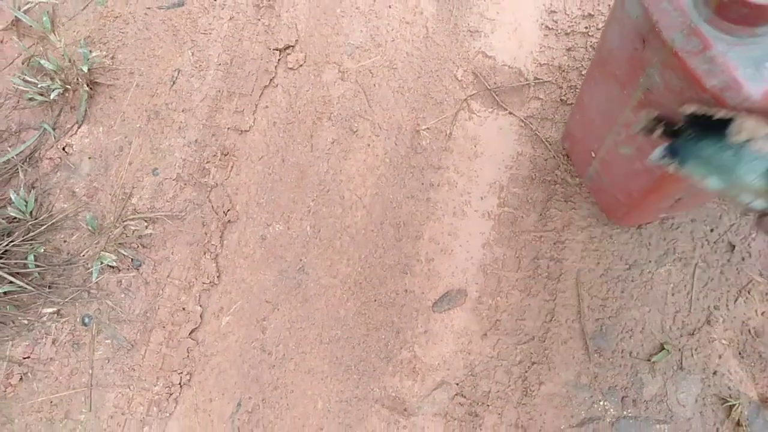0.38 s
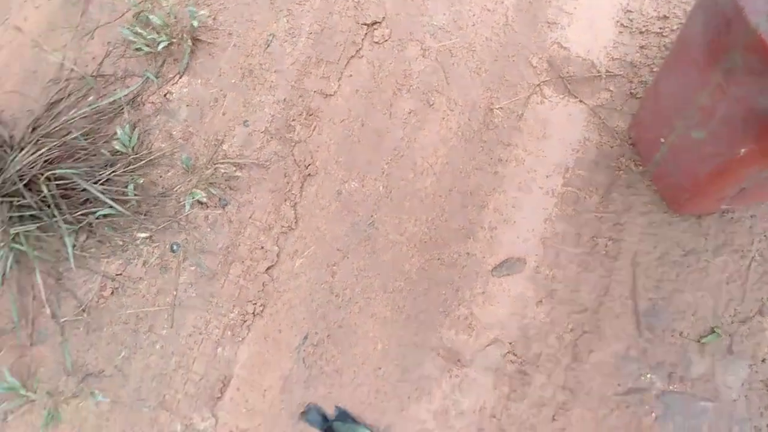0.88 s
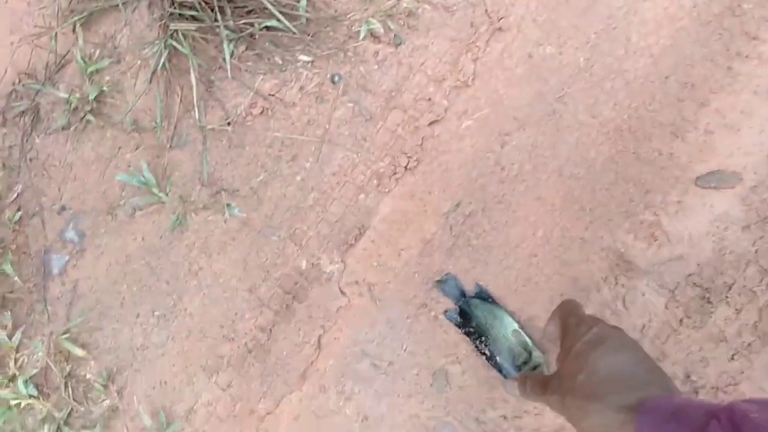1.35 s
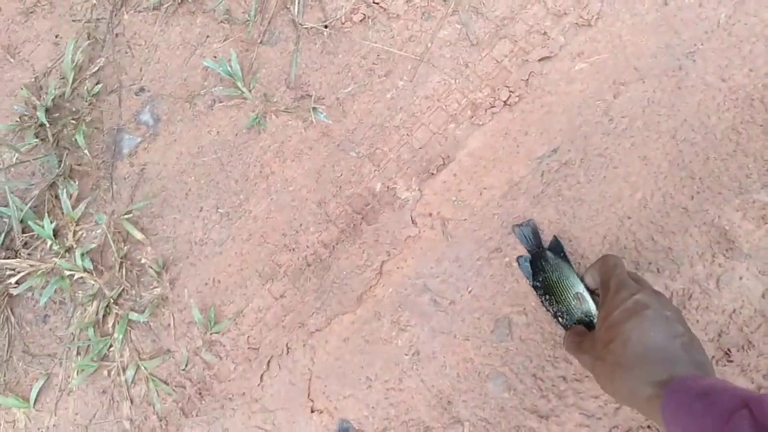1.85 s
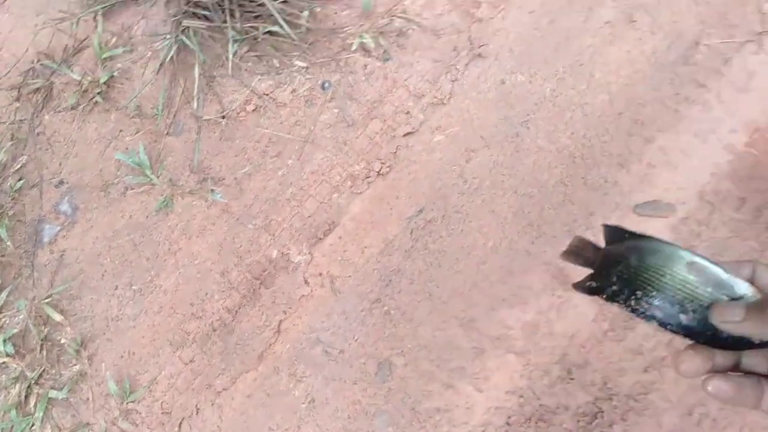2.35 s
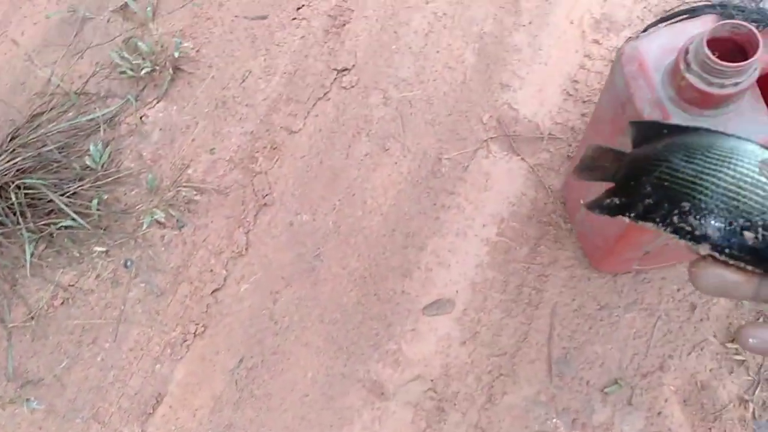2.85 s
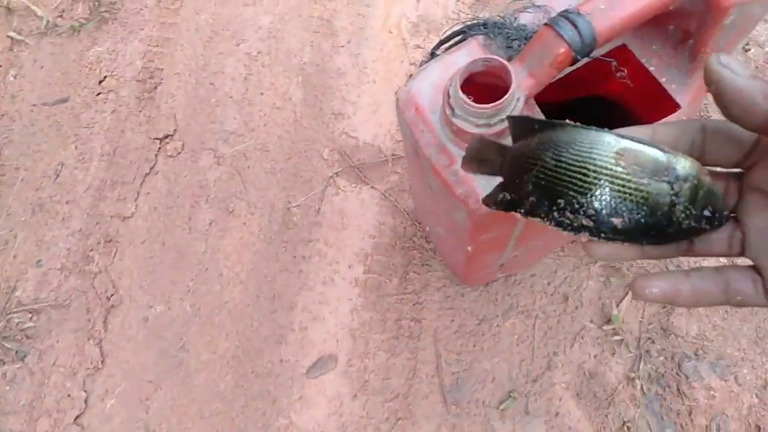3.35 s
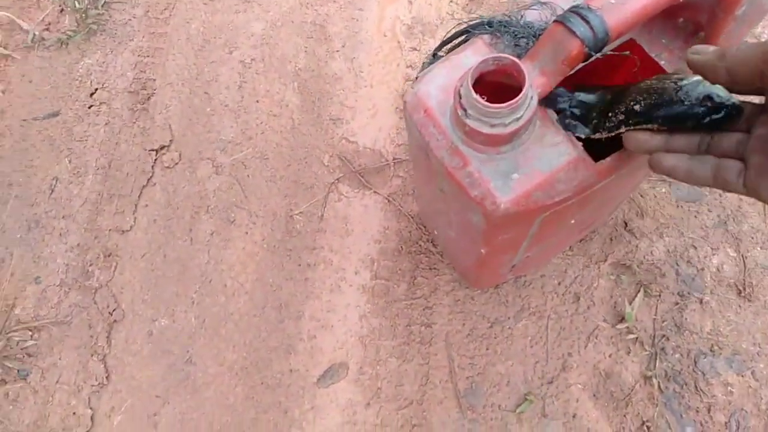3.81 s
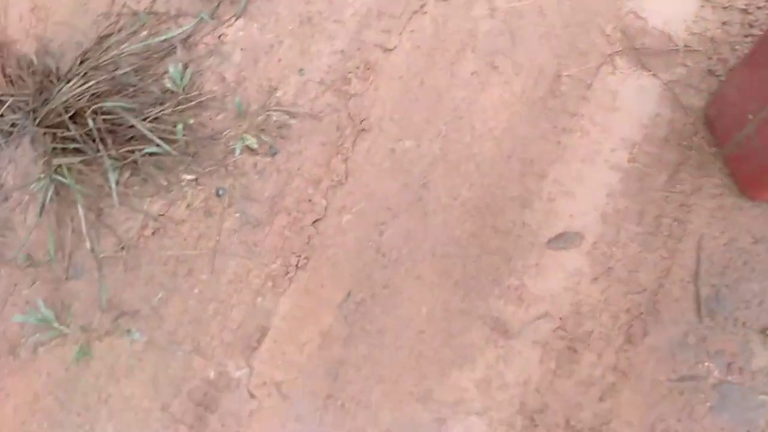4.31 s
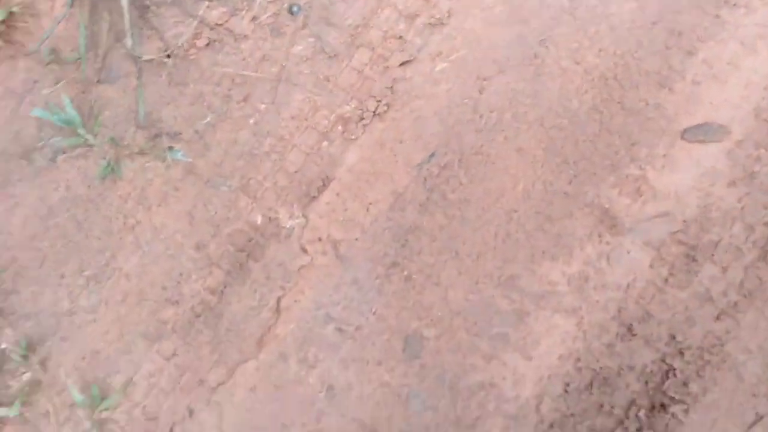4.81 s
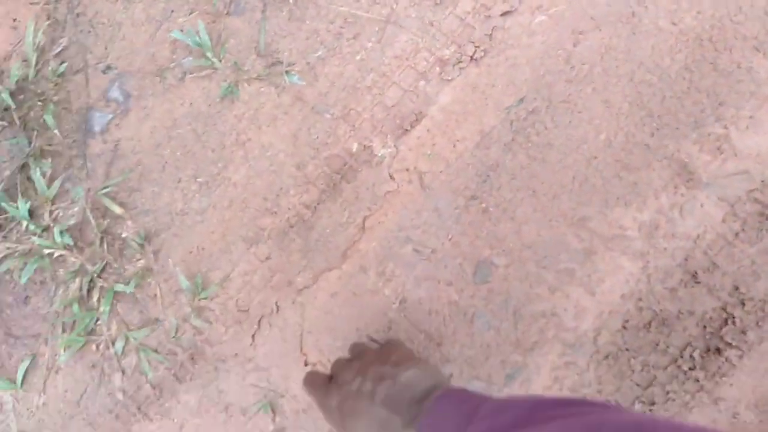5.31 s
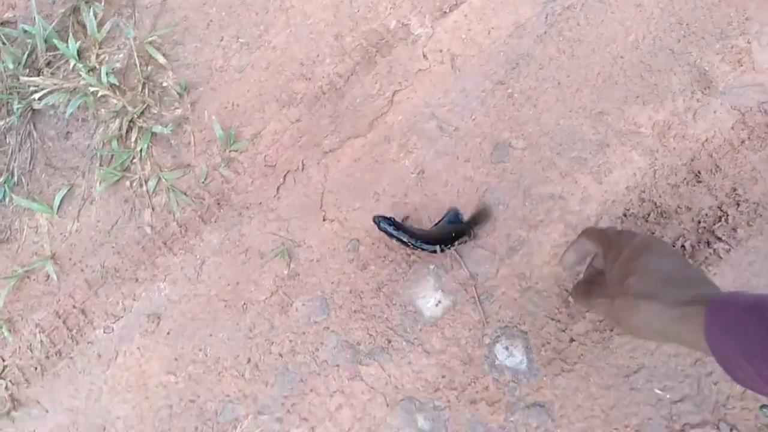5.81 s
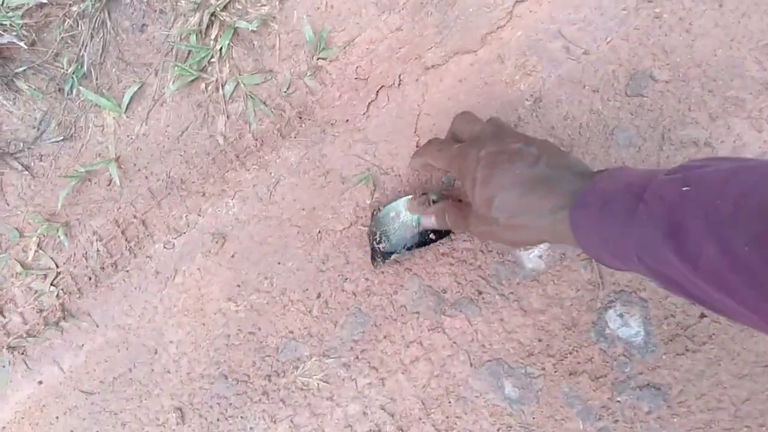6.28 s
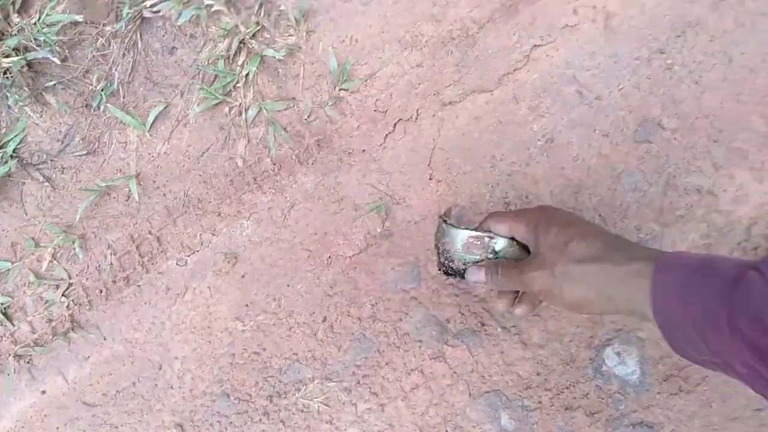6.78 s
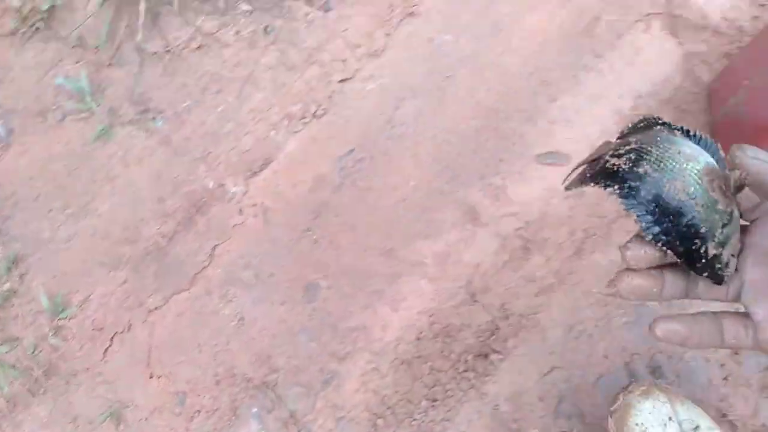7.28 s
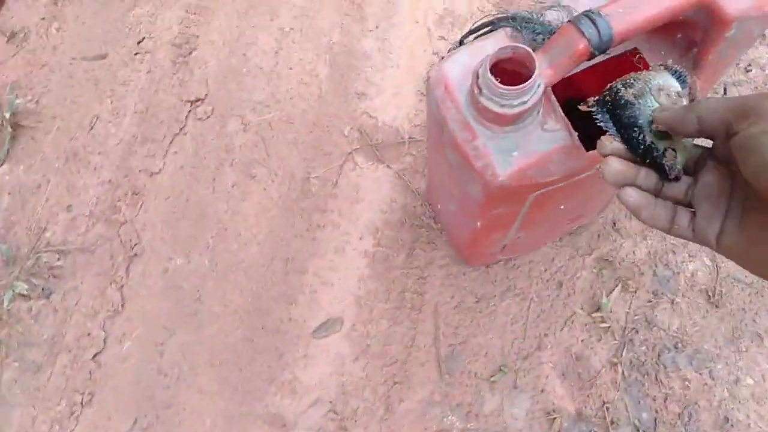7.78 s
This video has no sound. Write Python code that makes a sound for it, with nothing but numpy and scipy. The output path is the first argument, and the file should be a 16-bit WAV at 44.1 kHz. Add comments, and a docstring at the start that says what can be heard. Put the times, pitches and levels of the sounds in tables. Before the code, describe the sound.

A dense, high insect chorus runs throughout on an open dirt track with light wind and soft rustling. Close to the microphone, a hand handles small fish: light taps first, then thick wet slaps, grit spray and plops against a thin plastic can. After about five seconds mostly dry taps on dirt remain, before a last burst of slaps and scuffs and a small wind puff.

```python
"""Insects sing steadily over a dirt track, as noisy pulses ringing in wings; light wind, rustle and hiss are shaped noise.
Soon a hand starts on small fish and a plastic can: clicks make taps, noise bursts make slaps, low tones make thuds.
Grit sprays, a few high chirps sound, sleeve and sandals scuff (dragged clicks), and rising tones plop in the can.
From 2 to 5 s fish flap thickly, the can wall rings, and a faint run of ticks passes near 3.3 s.
Then come mostly taps on dirt, a last flurry of slaps and scuffs after 7 s, and a puff of wind at 8 s."""
import sys
import numpy as np
from scipy import signal
from scipy.io import wavfile

SR = 44100
rng = np.random.default_rng(int(sys.argv[2]) if len(sys.argv) > 2 else 0)


def invert_db(level):
    """Linear amplitude ratio for a level in decibels (20 dB per decade), elementwise."""
    return 10 ** (np.asarray(level, dtype=float) / 20)


def store_wav(level_fs):
    """Save 16-bit WAV to argv[1]."""
    pcm = np.round(np.clip(np.atleast_2d(level_fs), -1, 1) * 32767)
    wavfile.write(sys.argv[1], SR, pcm.T.astype(np.int16))


N = 358974  # length in samples

# insect kinds: wing_hz, pitch_spread_hz, ring_t60_s (time to fall 60 dB), pulses_per_s, chirps_per_s, #
# throb_db, level_db, near_db (near singer against each of the others); # the last row is the high overtone of
# the 6.7 kHz singers, made the same way as a kind
INSECT_KINDS = [(4667, 123, 0.032, 125, 12.2, 0.5, -51.5, -1), (5415, 410, 0.0053, 58, 7.9, 4, -50, -5),
                (6690, 280, 0.015, 83.2, 15, 2, -48.5, 5), (7520, 25, 0.066, 200, 7.7, 6, -65, 20),
                (9450, 70, 0.015, 60, 14, 4, -70, 21), (13650, 220, 0.008, 100, 20, 1, -54, 16)]
# the whole choir swells as one: time_s, change_db
CHOIR_SWELL = [(0.0, .5), (0.36, -0.5), (4.22, 1.5), (5.0, -.5), (5.24, 0), (6.82, 0.9), (8.14, 0.)]
# the faint fifth kind sings up for a while
BOUT_S, BOUT_HALF_S, BOUT_DB = 4.3, 0.7, 7

# tone colour of the wind: pitch_hz, density_db (per Hz)
WIND_COLOUR = [(14, 14), (24, 5), (40, -9.5), (70, 1), (120, -8), (260, -28)]
# puffs of wind on the microphone port: peak_s, peak_db, half_length_s
WIND_PUFFS = [(0.97, -41, 0.055), (2.175, -48, 0.046), (2.76, -54, 0.076), (3.107, -59, .08),
              (3.3, -53, .09), (4.62, -50, 0.55), (5.192, -55, 0.064), (7.196, -53, 0.14),
              (7.9, -48.5, 0.11), (8.03, -36, 0.043)]
BREEZE_DB = -53  # steady wind under the puffs

# how busy hand and body are, as rustle level: time_s, level_db
STIRRING = [(0.0, -51), (0.91, -53.5), (0.97, -49.5), (1.75, -53), (2.18, -46), (2.51, -50), (2.73, -45.5),
            (2.9, -49.5), (3.29, -50), (3.42, -53), (4.06, -48), (4.62, -50), (5.42, -53), (6.35, -51),
            (7.2, -52.5), (7.33, -43.5), (7.78, -51), (8.14, -53.5)]
# tone colour of the rustle: pitch_hz, density_db (per Hz)
RUSTLE_COLOUR = [(71, -18), (120, -1.5), (159, -0.5), (280, -9), (818, -9), (921, -10.5), (2940, -13.5),
                 (3780, -17), (4200, -3), (5460, -35.5), (9240, -120)]
# tone colour of the far hiss: pitch_hz, density_db (per Hz)
HISS_COLOUR = [(3600, -52), (6000, 14), (7400, -0.5), (8200, -5.5), (10000, 0), (12200, -4), (13200, 2),
               (15900, 2.5)]
HISS_DB, HISS_FOLLOWS = -48, 0.52  # level at mean stirring; share of its swing in dB
SQUELCH_FROM_DB, SQUELCH_PER_S_DB = -52, 41  # crackles start above this stirring; more per second for each dB

# dry taps and snaps of finger, fin and grit on dirt: start_s, peak_db, centre_hz
DRY_TAPS = [(0.239, -37, 694), (0.301, -23, 2980), (0.692, -28.5, 3000), (1.107, -31.5, 1710),
            (1.309, -28, 2600), (1.81, -29, 3000), (2.651, -19, 1870), (3.274, -37, 2140),
            (3.76, -33, 2100), (4.5042, -35, 4430), (4.361, -29, 1730), (4.606, -39, 2500),
            (4.679, -28, 7000), (4.746, -20, 1490), (4.979, -39, 840), (5.056, -33, 6520),
            (5.18, -33, 3400), (5.247, -17.5, 1180), (5.287, -40, 1030), (5.49, -27, 3000),
            (5.767, -27.5, 556), (5.7723, -24, 9000), (5.82, -36, 738), (5.95, -24, 2710),
            (5.978, -25.5, 540), (6.002, -25.5, 1730), (6.123, -31.5, 960), (6.194, -16.5, 1790),
            (6.1926, -22, 9100), (6.234, -22.5, 2320), (6.353, -35, 3000), (6.446, -35, 999),
            (6.517, -29, 2670), (6.957, -29, 3190), (7.042, -33, 6330), (7.063, -26, 3700),
            (7.152, -27, 493), (7.17, -31, 800), (7.178, -28, 784), (7.211, -22, 520), (7.264, -38, 2420),
            (7.3616, -19, 5920), (7.424, -25, 5760), (7.513, -23, 1470), (7.897, -26, 1450)]
# wet slaps of fish on hand and can: start_s, level_db, centre_hz, t60_s
WET_SLAPS = [(0.299, -31, 975, 0.076), (0.689, -39, 900, 0.068), (0.93, -36, 1780, 0.069),
             (1.005, -40, 1630, 0.055), (1.254, -44, 503, 0.057), (1.974, -33.5, 1890, 0.16),
             (2.146, -27.5, 950, 0.13), (2.212, -32.5, 1410, 0.051), (2.307, -24.5, 1030, 0.037),
             (2.39, -41.5, 503, 0.043), (2.576, -40, 3860, 0.12), (2.651, -19, 1620, 0.07),
             (2.716, -48, 511, 0.06), (2.842, -31.5, 3160, 0.05), (2.945, -33, 1260, 0.1),
             (2.976, -26, 2140, 0.044), (3.125, -27, 1420, 0.064), (3.298, -25.5, 2770, 0.046),
             (3.413, -33.5, 2500, 0.012), (3.457, -41.5, 2140, 0.16), (3.759, -35.5, 2110, 0.047),
             (3.776, -29, 1210, 0.061), (3.895, -42.5, 681, 0.095), (3.933, -35.5, 990, 0.22),
             (3.98, -30.5, 910, 0.045), (4.024, -35, 910, 0.14), (4.045, -21.5, 899, 0.056),
             (4.166, -38, 2490, 0.055), (4.239, -38.5, 810, 0.1), (4.29, -42.5, 2550, 0.072),
             (4.359, -36.5, 1670, 0.031), (4.505, -29, 3800, 0.021), (4.744, -33, 730, 0.04),
             (7.061, -44, 450, 0.041), (7.178, -40, 3290, 0.034), (7.209, -22.5, 440, 0.041),
             (7.421, -27, 2700, 0.077), (7.439, -27, 1480, 0.074)]
# ringing modes of the thin can wall: pitch_hz, level_db, t60_s
CAN_MODES = [(510, -2, 0.028), (837.5, -9.5, 0.12), (910, -7, 0.022), (1284, -11, 0.11), (1630, -7.5, 0.05),
             (1810, -14, 0.11), (2140, -8, 0.048), (2583, -6, 0.035), (3300, -11, 0.046)]
WALL_OVER_SLAP_DB = -0.5
# dull thuds of handling: start_s, level_db, pitch_hz
HANDLING_THUDS = [(0.319, -34.5, 215), (0.732, -42.5, 221), (0.925, -40, 254), (1.25, -33.5, 205),
                  (1.739, -40.5, 120), (1.971, -31.5, 210), (2.141, -37.5, 224), (2.209, -36.5, 234),
                  (3.072, -39.5, 144), (3.276, -36.5, 127), (3.483, -39.5, 244), (3.899, -34.5, 198),
                  (3.982, -30, 213), (4.047, -25, 216), (4.181, -36.5, 116), (4.483, -37, 119),
                  (4.741, -46, 169), (5.203, -45.5, 112), (7.204, -41, 174)]

# wet ticks and spray: start_s, droplets_db, duller_grit_db
WET_SPRAY = [(0.519, -39, -56), (0.937, -29.5, -61), (0.968, -26, -33), (1.01, -26, -43), (1.109, -39, -44),
             (1.975, -29, -48), (2.0472, -40, -53), (2.2115, -23.5, -28), (2.3063, -28, -25),
             (2.388, -34, -56), (2.44, -45, -31), (2.5, -36, -34), (2.572, -32, -36), (2.6424, -29, -31),
             (2.7208, -29.5, -46), (2.973, -25, -35), (3.2181, -33.5, -41), (3.775, -39, -26),
             (4.1704, -42, -34), (4.1874, -35, -33.5), (4.505, -32, -24.5), (4.744, -36, -38),
             (5.053, -41, -37), (5.7692, -30.5, -32), (6.191, -34, -30), (6.955, -39.5, -36),
             (7.3083, -41, -44), (7.359, -34, -18), (7.416, -40, -24.5)]
SPRAY_T60_S = 0.085  # the duller grit falls twice as fast
# tone colour of fine grit: pitch_hz, density_db (per Hz)
GRIT_COLOUR = [(6500, -2), (9000, -10), (12300, -7.5), (13300, -1), (14500, 1), (15900, -5)]

# lone high chirps: start_s, level_db, pitch_hz
HIGH_CHIRPS = [(0.5891, -42, 10300), (0.8036, -33.5, 9140), (1.1573, -42.5, 9600), (1.2491, -41, 8460),
               (1.5594, -44, 9500)]
# bubbles and drips in the can: start_s, level_db, pitch_hz
CAN_PLOPS = [(0.93, -37, 1874), (0.983, -27, 3130), (1.008, -28, 1985), (1.019, -28, 3440),
             (1.809, -28.5, 2610), (2.004, -22.5, 1386), (2.086, -26.5, 1350), (2.128, -33, 1630),
             (2.339, -41.5, 2110), (2.444, -41.5, 2300), (2.49, -36, 850), (2.555, -38, 996),
             (2.594, -39, 2110), (2.669, -40, 850), (2.749, -34.5, 493), (2.95, -32, 1284),
             (3.009, -36, 873), (3.062, -45, 3000), (3.088, -43.5, 1430), (3.272, -26, 2140),
             (3.296, -30.5, 2990), (3.412, -28, 2610), (3.459, -25.5, 2050), (3.469, -39, 3000),
             (3.567, -37.5, 1620), (3.601, -43, 3220), (3.642, -33, 2080), (3.692, -41.5, 1780),
             (3.772, -28.5, 1230), (3.856, -43.5, 1680), (4.029, -21, 899), (4.046, -23.5, 899),
             (4.184, -43, 1930), (4.214, -36.5, 853), (4.294, -42, 2500), (4.45, -38.5, 3030),
             (4.474, -37, 3670), (4.869, -45.5, 740), (4.998, -37.5, 812), (7.179, -27, 3300)]
CHIRP_T60_S, PLOP_T60_S = 0.047, 0.076

# drawn-out scuffs of hand, cloth and sole: peak_s, rise_s, fall_s, body_db, grit_db
SCUFF_STROKES = [(1.012, 0.088, 0.048, -32, -36.5), (2.92, 0.86, 0.51, -47.5, -48),
                 (4.055, 0.14, 0.031, -31, -40), (4.184, .034, 0.28, -44.5, -38),
                 (7.19, 0.21, 0.34, -41.5, -50), (7.43, 0.28, 0.043, -31.5, -32),
                 (7.5, 0.23, 0.35, -43, -52), (4.72, 0.12, 0.22, -47.5, -45)]
# what each scuff rings in, one list a scuff: pitch_hz, width_hz, density_db (per Hz)
SCUFF_RESONANCES = [
    [(1620, 180, 1), (3300, 1100, -6.5)],
    [(520, 59, 10), (740, 270, 5), (2630, 110, -6)],
    [(899, 470, -20.5), (1804, 44, -11)],
    [(840, 34, 2), (1930, 150, 1), (2550, 700, 9)],
    [(493, 150, -2), (2410, 87, -4), (3400, 250, 1)],
    [(713, 270, 0), (2560, 280, -4), (5590, 450, 3.5)],
    [(700, 620, 7), (2450, 200, 0)],
    [(1180, 1500, 5), (2500, 710, -3)],
]
# tone colour of the broad part of a scuff: pitch_hz, density_db (per Hz)
SCUFF_COLOUR = [(200, -13), (700, -5), (2000, 0), (4000, -1.5), (7000, -2.5)]
SCUFF_SWELL_DB, GRIT_SWELL_DB = 24.5, 31.5  # how far body and grit sink at either end of a stroke

# a faint run of small ticks
RATTLE_S, RATTLE_HALF_S, RATTLE_PER_S, RATTLE_HZ, RATTLE_DB = 3.33, 0.22, 44, 3950, -31
RATTLE_TICKS = 24

CUTOFF_HZ = 15520  # top of the finished sound


def rms_one(x):
    """Scales a sound to an average strength (rms) of 1."""
    return x / np.sqrt(np.mean(x ** 2) + 1e-20)


def in_time(rows):
    """Draws straight lines between (time, value) rows, one value a sample."""
    return np.interp(np.arange(N) / SR, *np.transpose(rows))


def hump(s, half_s):
    """A smooth swell of height 1 around a moment."""
    return np.exp(-((np.arange(N) / SR - s) / half_s) ** 2)


def drift(rate_hz):
    """Slow random wandering with spread 1, made at every 40th sample and joined up."""
    r = np.exp(-80 * np.pi * rate_hz / SR)
    noise = rng.standard_normal(N // 40 + 2002)
    slow = signal.lfilter([1], [1, -2 * r, r * r], noise)[2000:]  # skip the filter's start
    return np.interp(np.arange(N) / 40, np.arange(len(slow)), rms_one(slow))


def ring(clicks, hz, t60):
    """A resonance: each unit click sets off a fading sine of starting height 1."""
    r = invert_db(-60 / (t60 * SR))
    w = 2 * np.pi * hz / SR
    return signal.lfilter([0, np.sin(w)], [1, -2 * r * np.cos(w), r * r], clicks + 1e-18)


def band(x, low_hz, high_hz):
    """Keeps the sound between two pitches."""
    return signal.sosfilt(signal.butter(2, [low_hz, high_hz], "band", fs=SR, output="sos"), x)


def coloured(source, spectrum, patchy_db):
    """Filters two noises by turns in about third-octave bands, each with its level and flicker; rms 1."""
    hz, db = np.transpose(spectrum)
    edges = np.geomspace(hz[0], hz[-1], int(3 * np.log2(hz[-1] / hz[0])) + 3)
    out = 0
    for k, (low, high) in enumerate(zip(edges, edges[1:])):
        level_db = np.interp(np.log(low * high) / 2, np.log(hz), db)
        flicker_db = patchy_db * drift(11.2)
        out = out + invert_db(level_db + flicker_db) * band(source[k % 2], low, high)
    return rms_one(out)


def grains(per_s, size_db):
    """Two rows of random clicks, up or down, most small and a few much larger."""
    sizes = invert_db(size_db * np.minimum(rng.exponential(1, (2, N)), 5))
    signs = rng.choice([-1, 1], (2, N))
    present = rng.random((2, N)) < per_s / SR
    return sizes * signs * present


def burst(t60, rise_s):
    """Loudness shape of one blow: a quick rise, then an exponential fall."""
    t = np.arange(int(SR * min(t60, 0.25)) + 64) / SR
    return np.minimum(t / rise_s, 1) * invert_db(-60 * t / t60)


def add(out, s, piece):
    """Mixes a short piece in at a given second."""
    at = round(s * SR)
    out[at:at + len(piece)] += piece[:N - at]


def insects():
    """Each kind is four singers whose noisy wing strokes ring at wing pitch; the near one keeps the set pace."""
    t, out = np.arange(N) / SR, np.zeros(N)
    for kind, row in enumerate(INSECT_KINDS):
        hz, spread, t60, pulses, chirps, throb_db, level_db, near_db = row
        swell_db = in_time(CHOIR_SWELL)
        if kind == 4:
            swell_db = swell_db + BOUT_DB * hump(BOUT_S, BOUT_HALF_S)
        crowd = 0
        for k, (pace, start) in enumerate(rng.normal(0, 1, (4, 2))):
            near = k == 0
            phase = pulses * (1 + 0.05 * pace * (not near)) * t + start
            strokes = 1.7 + np.cos(2 * np.pi * phase)
            throb = invert_db(throb_db * np.cos(2 * np.pi * phase * chirps / pulses) + 2.3 * drift(0.5))
            scraping = strokes * throb * rng.standard_normal(N) * invert_db(near_db * near)
            # the others sit below and above the near singer's pitch
            pitch_hz = hz + spread * (k - 1.43 * (k > 1)) * (-1) ** k
            crowd = crowd + ring(scraping, pitch_hz, t60)
        out += invert_db(level_db + swell_db) * rms_one(band(crowd, hz * 0.947, hz * 1.045))
    return out


def wind():
    """Low, lumpy noise: a steady breeze on the microphone port with short puffs."""
    gusts = invert_db(BREEZE_DB) + sum(invert_db(db) * hump(s, half_s) for s, db, half_s in WIND_PUFFS)
    rumble = coloured(rng.standard_normal((2, N)), WIND_COLOUR, patchy_db=5.5)
    return gusts * band(rumble, 8.2, 270)


def rustle(rustle_db):
    """Soft noise with stray ticks, as loud as the stirring."""
    source = rng.standard_normal((2, N)) + 1.2 * grains(150, 3.5)
    return invert_db(rustle_db) * coloured(source, RUSTLE_COLOUR, patchy_db=1.0)


def hiss(rustle_db):
    """Far bright noise that partly follows the stirring."""
    hiss_db = HISS_DB + HISS_FOLLOWS * (rustle_db - rustle_db.mean())
    return invert_db(hiss_db) * coloured(rng.standard_normal((2, N)), HISS_COLOUR, patchy_db=0.4)


def squelches(rustle_db):
    """Small wet crackles, only while things stir, each ringing some cycles at one of twelve pitches."""
    per_s = SQUELCH_PER_S_DB * np.clip(rustle_db - SQUELCH_FROM_DB, 0, 8)
    born = rng.random(N) < per_s / SR
    sizes = born * invert_db(5.9 * np.minimum(rng.exponential(1, N), 3))
    dealt = rng.integers(0, 12, N)  # which pitch each crackle gets
    out = np.zeros(N)
    for k, hz in enumerate(np.geomspace(900, 5500, 12)):
        out += ring(sizes * (dealt == k), hz, 44.0 / hz)
    return invert_db(-54) * out


def taps():
    """One hard contact, a click in a wide band that rings a cycle or two, in quickly fading noise."""
    out = np.zeros(N)
    for s, db, hz in DRY_TAPS:
        contact = 0.13 * rng.standard_normal(1200) * invert_db(-2500 * np.arange(1200) / SR)
        contact[[20, 24]] += 1, -0.3  # the hit and its rebound
        click = band(contact, max(hz * 0.32, 200), min(hz * 2.2, 16000))
        add(out, s, invert_db(db) * click / np.abs(click).max())
    return out


def slaps():
    """A wet blow: a crack, then a short gritty burst of noise around its centre pitch."""
    out = np.zeros(N)
    for s, db, hz, t60 in WET_SLAPS:
        shape = burst(np.clip(t60, 0.01, 0.2), 0.0012)
        noise = rng.standard_normal(len(shape))
        gritty = noise * np.abs(noise) ** 0.78  # makes the peaks stand out
        gritty[10] += 6.0  # first contact
        edges = max(hz * 0.43, 250), min(hz * 2.13, 6000)
        add(out, s, invert_db(db) * shape * rms_one(band(band(gritty, *edges), *edges)))
    return out


def can_wall():
    """Each slap also shakes the thin can wall, which rings in its own fixed pitches."""
    out = np.zeros(N)
    start_s, slap_db, centre_hz, _ = np.transpose(WET_SLAPS)
    at = np.round(start_s * SR).astype(int)
    for hz, mode_db, t60 in CAN_MODES:
        near_db = -9 * np.abs(np.log2(hz / centre_hz))  # modes near the centre of the blow ring most
        luck_db = rng.normal(0, 7.1, len(at))
        clicks = np.zeros(N)
        clicks[at] = invert_db(slap_db + WALL_OVER_SLAP_DB + mode_db + near_db + luck_db)
        out += ring(clicks, hz, t60)
    return out


def thuds():
    """A soft push: a few heavily damped cycles with low noise around them."""
    out = np.zeros(N)
    for s, db, hz in HANDLING_THUDS:
        shape = burst(32.4 / hz, 0.0044)
        t = np.arange(len(shape)) / SR
        low_noise = rms_one(band(rng.standard_normal(len(t)), 63, 400))
        add(out, s, invert_db(db) * shape * (np.sin(2 * np.pi * hz * t) + 0.5 * low_noise))
    return out


def spray():
    """Short bright bursts of many tiny droplet and grit clicks, over a duller burst."""
    bright, dull = np.zeros(N), np.zeros(N)
    for s, db, dull_db in WET_SPRAY:
        add(bright, s, invert_db(db) * burst(SPRAY_T60_S, 0.0053))
        add(dull, s, invert_db(dull_db) * burst(0.5 * SPRAY_T60_S, 0.0019))
    fine = grains(8000, 3.2)
    droplets = coloured(fine, GRIT_COLOUR, patchy_db=0.0)
    return bright * droplets + dull * rms_one(band(fine[1], 4180, 6760))


def rising_tones(rows, t60):
    """Fading sines that rise in pitch, beating with a close partner, roughened at random."""
    out = np.zeros(N)
    for s, db, hz in rows:
        shape = burst(t60, 0.0012)
        t = np.arange(len(shape)) / SR
        turn = 2 * np.pi * hz * t * (0.975 + 1.24 * t)
        beat_luck, start = rng.standard_normal(2)
        partner = np.sin(turn + 2 * np.pi * (90 + 30 * beat_luck) * t + start)
        wobble = np.interp(t * 400, np.arange(110), rng.standard_normal(110))  # 400 points a second
        rough = 1 + 0.7 * wobble * np.minimum(t / 0.003, 1)
        add(out, s, invert_db(db) * shape * rough * (np.sin(turn) + 0.25 * partner))
    return out


def chirps():
    """Lone high chirps: very short rising tones."""
    return rising_tones(HIGH_CHIRPS, CHIRP_T60_S)


def scuffs():
    """Grit dragged under a stroke: clicks, partly broad, partly caught in resonances, with a bright top."""
    clicks = grains(1200, 3.07)
    broad = coloured(clicks, SCUFF_COLOUR, patchy_db=3.0)
    grit = coloured(grains(9000, 0.87), GRIT_COLOUR, patchy_db=5.5)
    out = np.zeros(N)
    for (s, rise, fall, body_db, grit_db), resonances in zip(SCUFF_STROKES, SCUFF_RESONANCES):
        span = slice(round((s - rise) * SR), round((s + fall) * SR))
        sunk = in_time([(s - rise, 1), (s, 0), (s + fall, 1)])[span]  # 0 at the peak, 1 at the ends
        caught = 0
        for k, (hz, width, db) in enumerate(resonances):
            ringing = rms_one(ring(clicks[k % 2, span], hz, 6.4 / max(width, 40)))
            caught = caught + invert_db(db) * np.sqrt(width) * ringing
        body = rms_one(caught) + invert_db(-2.5) * broad[span]
        out[span] += invert_db(body_db - SCUFF_SWELL_DB * sunk) * body
        out[span] += invert_db(grit_db - GRIT_SWELL_DB * sunk) * grit[span]
    return out


def plops():
    """A bubble rings as a sine that rises as it nears the surface."""
    return rising_tones(CAN_PLOPS, PLOP_T60_S)


def rattle():
    """An uneven run of faint ticks, some left out, each ringing for a moment."""
    clicks = np.zeros(N)
    late, softer, kept = rng.random((3, RATTLE_TICKS))
    s = RATTLE_S + (np.arange(RATTLE_TICKS) - 12 + 0.25 * late) / RATTLE_PER_S
    clicks[(s * SR).astype(int)] = invert_db(RATTLE_DB - 6 * softer) * (kept < 0.8)
    return ring(clicks * hump(RATTLE_S, RATTLE_HALF_S), RATTLE_HZ, 0.0027)


def echoes(near):
    """Adds a few short echoes off dirt and can, the last 780 samples late."""
    ground = np.zeros(900)
    ground[[0, 130, 410, 780]] = 1.0, -0.043, -0.19, 0.15
    return signal.fftconvolve(near, ground)[:N]


def scene():
    """Mixes near sounds with their echoes and everything else, the same on both channels."""
    rustle_db = in_time(STIRRING)
    surroundings = wind() + rustle(rustle_db) + hiss(rustle_db) + squelches(rustle_db)
    near = taps() + slaps() + can_wall() + thuds() + spray() + chirps() + plops() + rattle()
    mono = insects() + surroundings + echoes(near) + scuffs()
    return np.array([mono, mono])


def band_limit(x):
    """A steep low-pass at the top of the band."""
    return signal.sosfilt(signal.butter(12, 16800, fs=SR, output="sos"), x)


def record(dry):
    """The one microphone's sound, with a steep cut of the highest treble."""
    steep_cut = signal.ellip(12, 0.5, 60, CUTOFF_HZ, fs=SR, output="sos")
    finished = signal.sosfilt(steep_cut, dry)
    return band_limit(finished)


dry = scene()
out = record(dry)
store_wav(out)
```